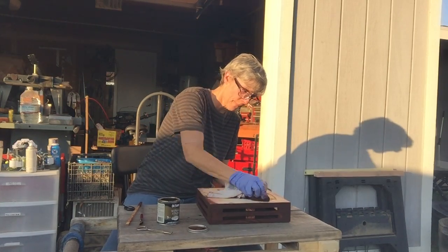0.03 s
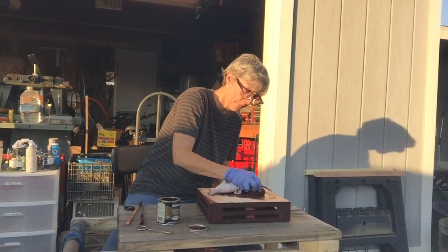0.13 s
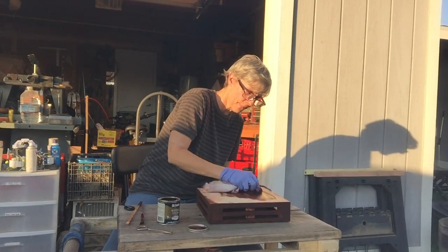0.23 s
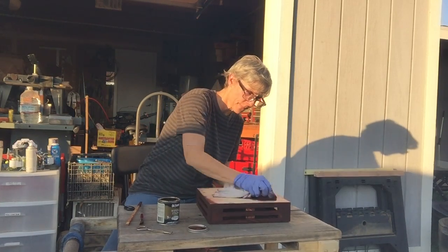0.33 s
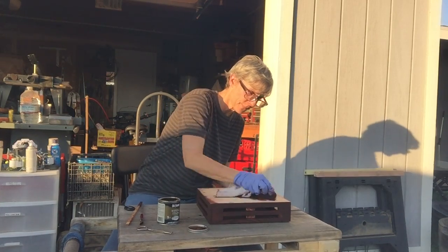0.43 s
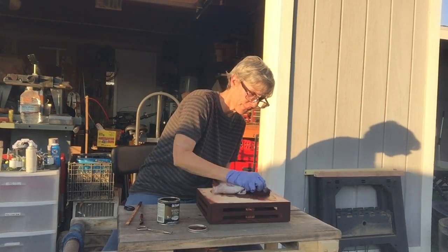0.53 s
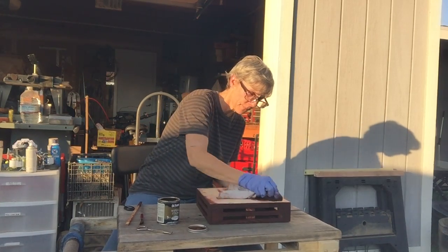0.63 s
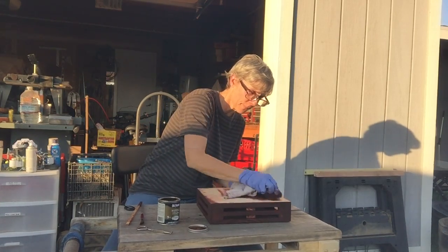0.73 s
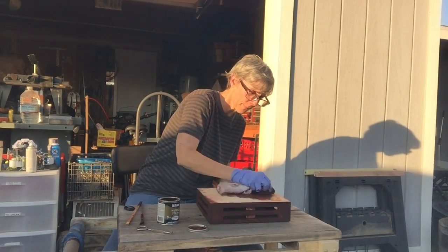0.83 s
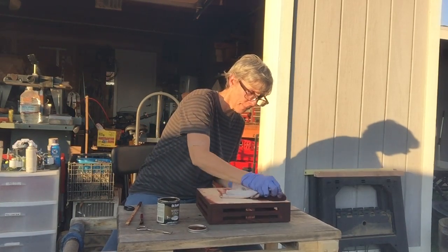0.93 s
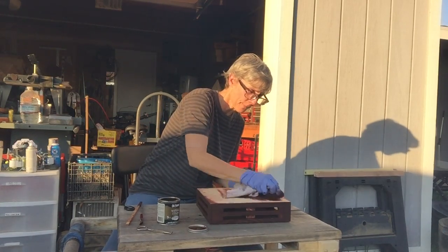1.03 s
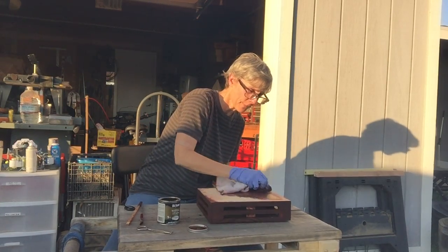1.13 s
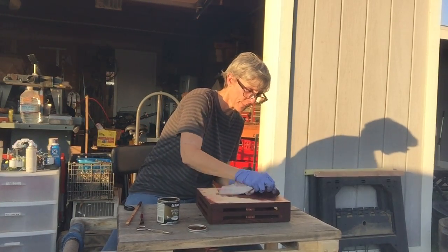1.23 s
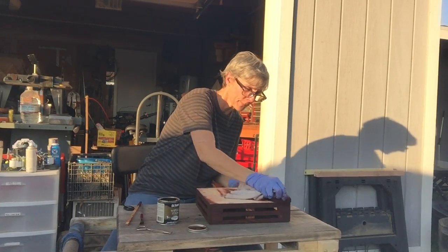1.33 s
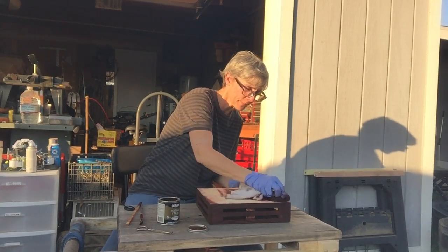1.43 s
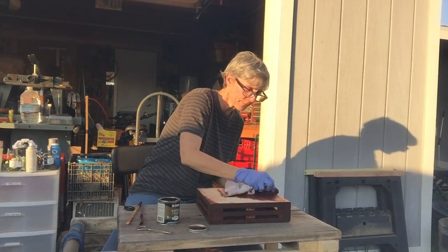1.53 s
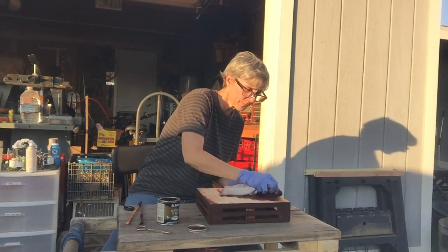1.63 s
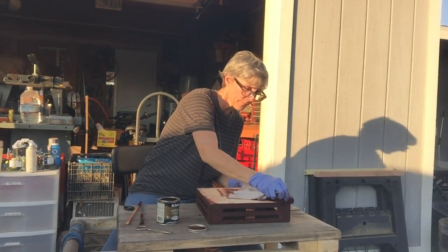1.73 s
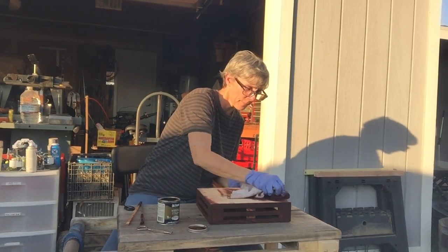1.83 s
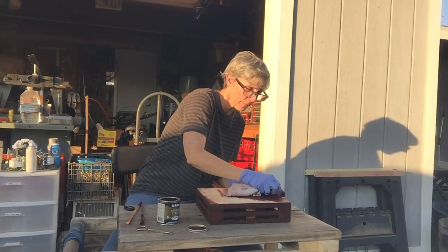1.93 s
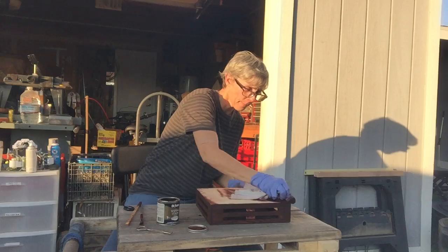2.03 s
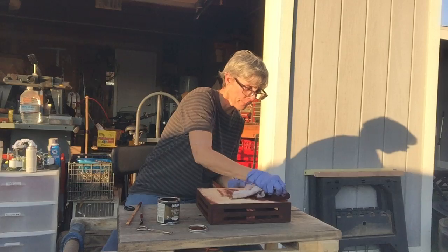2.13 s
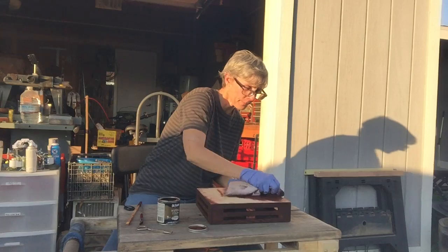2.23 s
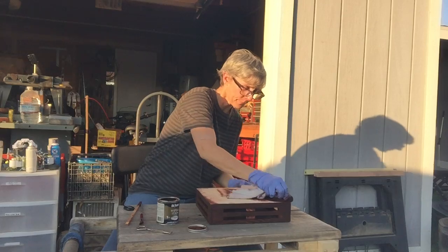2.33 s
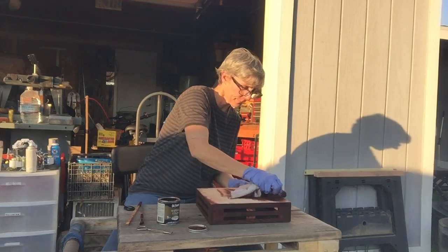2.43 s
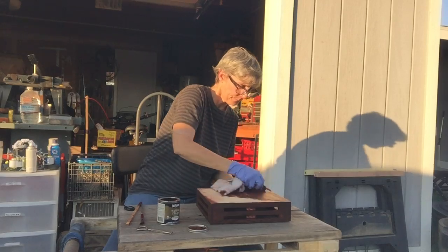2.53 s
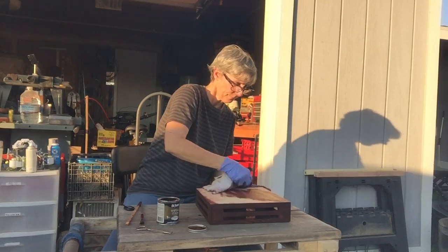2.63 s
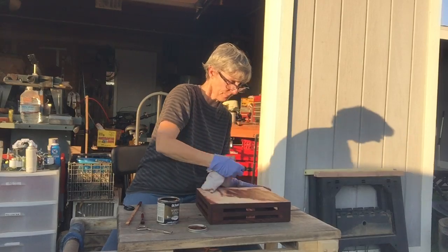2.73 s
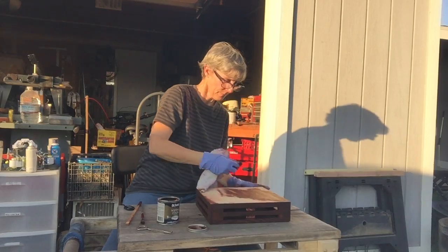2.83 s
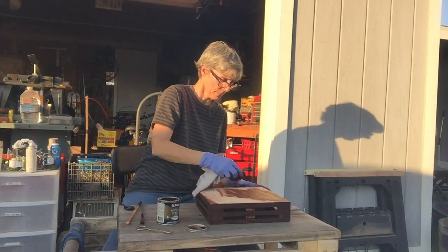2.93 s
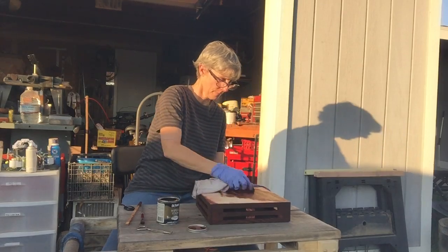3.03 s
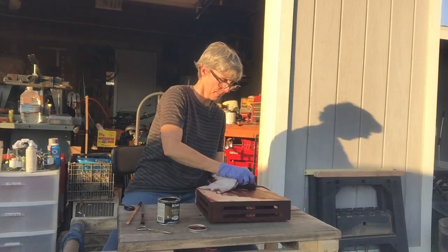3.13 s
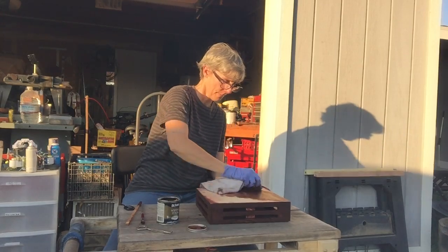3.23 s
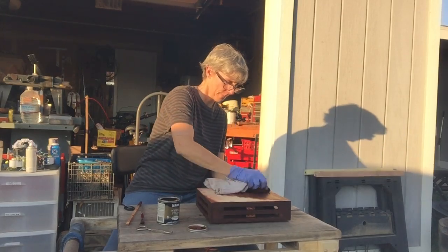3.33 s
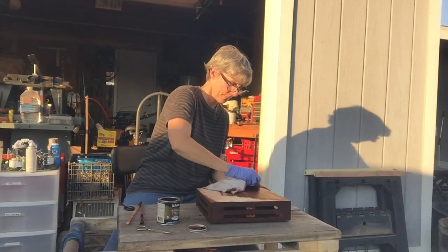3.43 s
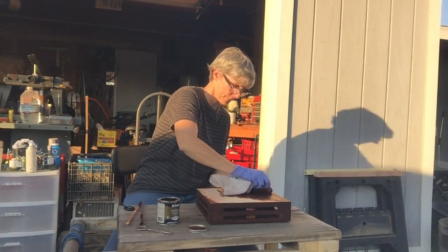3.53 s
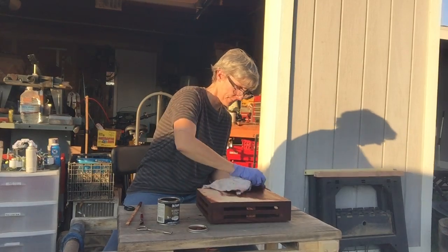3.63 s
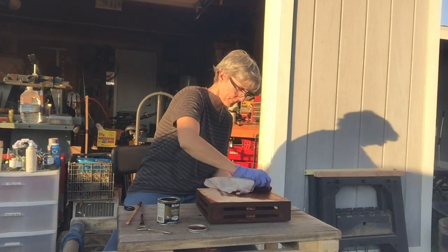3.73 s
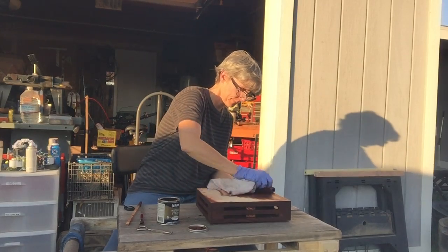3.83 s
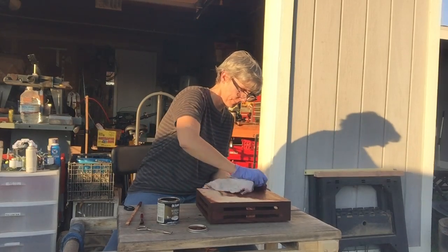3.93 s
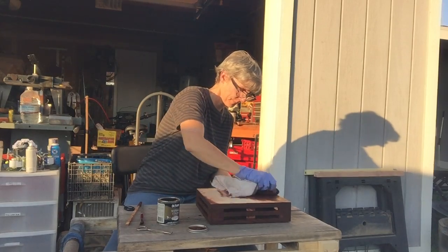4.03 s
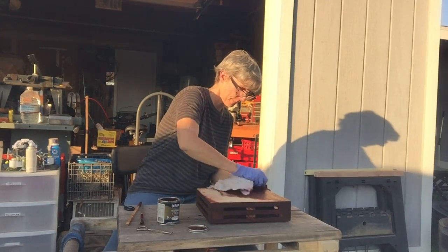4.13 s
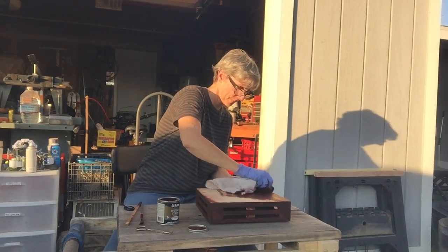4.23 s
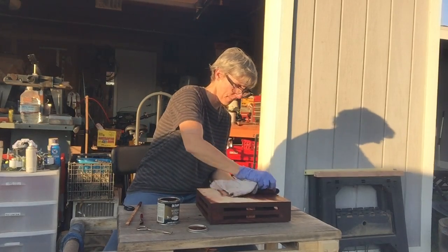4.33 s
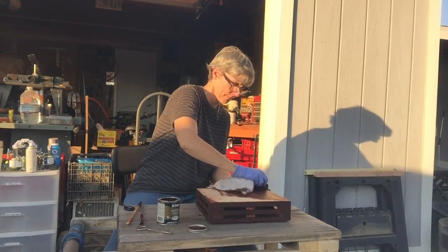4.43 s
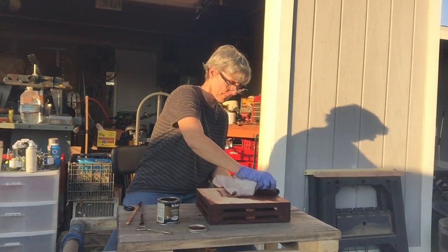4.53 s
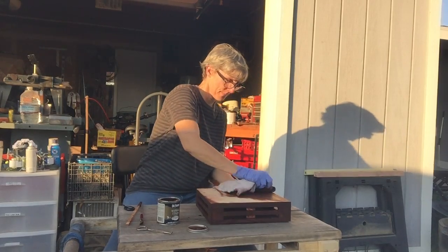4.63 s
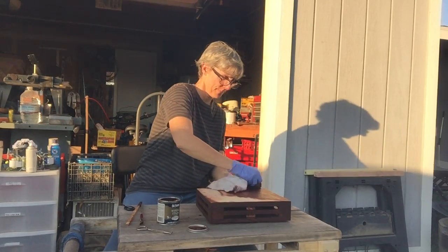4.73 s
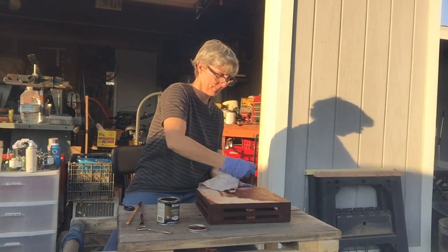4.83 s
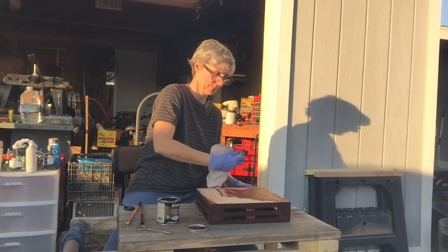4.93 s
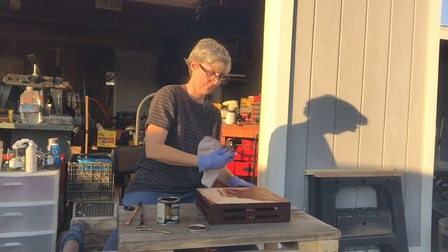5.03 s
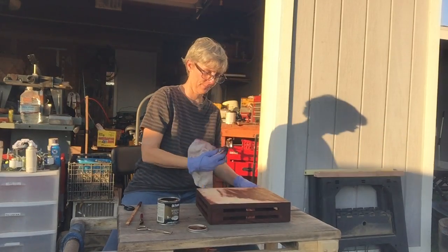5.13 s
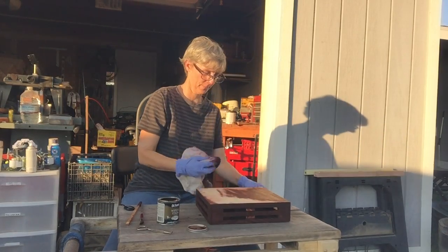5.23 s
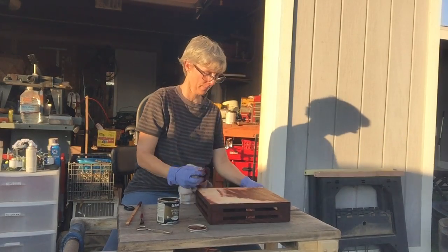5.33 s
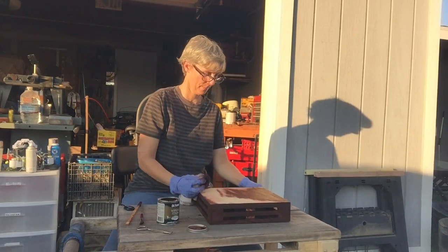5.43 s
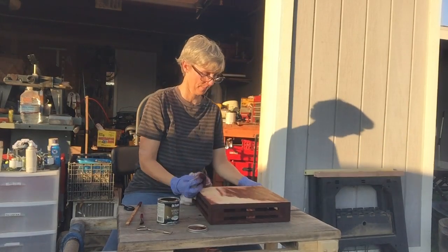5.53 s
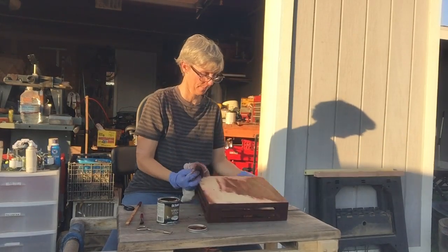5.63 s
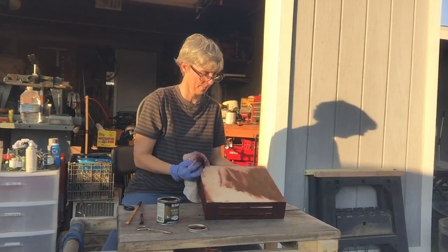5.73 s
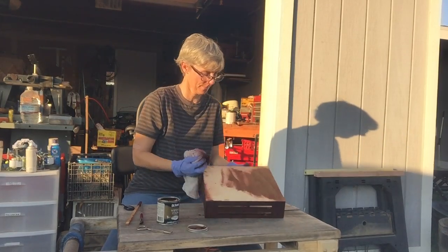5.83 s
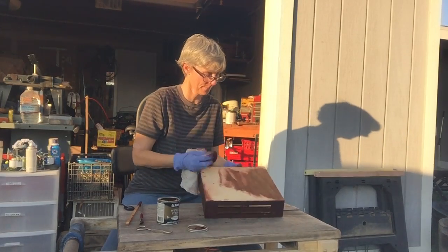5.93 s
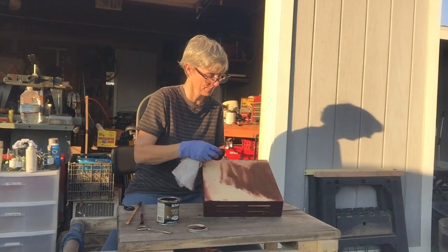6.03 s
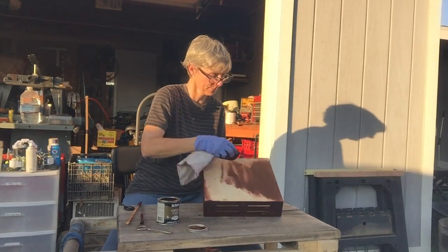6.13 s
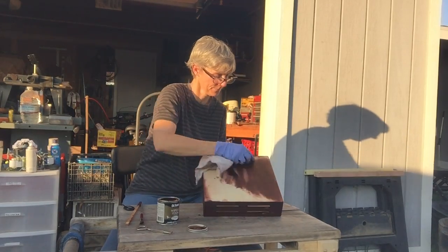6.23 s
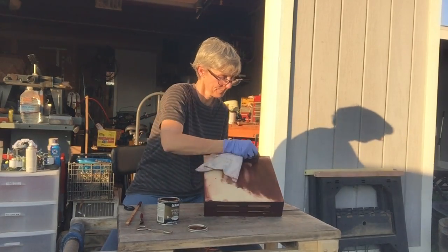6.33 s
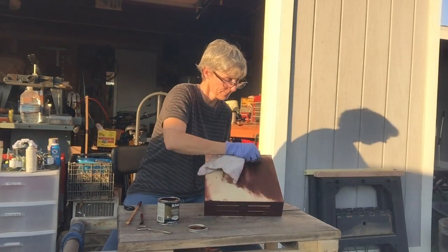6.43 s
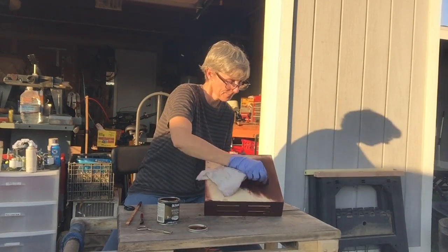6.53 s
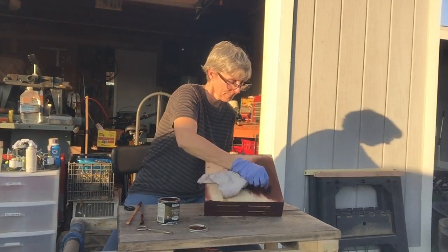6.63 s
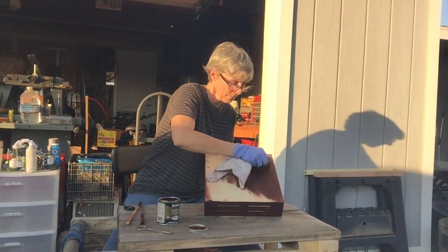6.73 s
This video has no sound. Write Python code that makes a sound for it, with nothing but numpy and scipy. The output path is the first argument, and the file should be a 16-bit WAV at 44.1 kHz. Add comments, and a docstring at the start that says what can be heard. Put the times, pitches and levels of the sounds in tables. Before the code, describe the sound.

A cloth rag rubs back and forth over a hollow wooden box that knocks against a workbench, then briefly scrapes.

```python
"""At an outdoor workbench, a rag is rubbed to and fro over a hollow wooden box, in a quiet hush.
Friction of fibres on the grain makes each stroke hiss. The box rocks, and its impacts on the bench
excite its normal modes. The rag rustles faintly as it is handled; the box is tipped on edge and
dragged twice over the planks, driven by stick-slip friction. A shed wall returns dull echoes."""
import sys
import numpy as np
from scipy import signal
from scipy.io import wavfile

SR = 44100
rng = np.random.default_rng(int(sys.argv[2]) if len(sys.argv) > 2 else 0)


def log_audio(samples):
    """Write samples as a 16-bit WAV file to the path given in sys.argv[1]."""
    # one column per channel
    frames = np.atleast_2d(samples).T
    # limit to full scale, then quantise
    limited = np.clip(frames, -1, 1)
    pcm = np.round(limited * 32767).astype(np.int16)
    wavfile.write(sys.argv[1], SR, pcm)


N = 298998
TIPPED_S = 5.5   # from here the box stands on its edge


def from_db(db):
    """Amplitude ratio of a level."""
    return 10 ** (np.asarray(db) / 20)


def unit_rms(x):
    """Normalisation to rms 1."""
    return x / np.sqrt(np.mean(x ** 2) + 1e-20)


def in_time(rows):
    """Linear interpolation of a table's columns at every sample."""
    times, *columns = np.transpose(rows)
    return [np.interp(np.arange(N) / SR, times, column) for column in columns]


def drift(corner_hz):
    """Low-passed Gaussian noise: a slow fluctuation of rms 1."""
    hold = 40   # samples per value
    r = np.exp(-2 * np.pi * corner_hz * hold / SR)
    slow = signal.lfilter([1], [1, -2 * r, r * r], rng.standard_normal(N // hold + 2002))[2000:]
    return np.repeat(unit_rms(slow), hold)[:N]


def ring(force, hz, t60):
    """Damped oscillator: a unit impulse starts a decaying sine of amplitude 1."""
    r, w = from_db(-60 / (t60 * SR)), 2 * np.pi * hz / SR
    return signal.lfilter([0, np.sin(w)], [1, -2 * r * np.cos(w), r * r], force + 1e-18)


def resonance(x, hz, width):
    """Second-order band-pass with unit peak gain."""
    r = np.exp(-np.pi * width / SR)
    poles = [1, -2 * r * np.cos(2 * np.pi * hz / SR), r * r]
    return signal.lfilter(np.array([1, 0, -1]) * (1 - r * r) / 2, poles, x)


def grains(per_s, spread_db):
    """Shot noise: random impulses of uneven size, rms 1."""
    sizes = from_db(spread_db * np.minimum(rng.exponential(1, N), 4)) * rng.standard_normal(N)
    return unit_rms(sizes * (rng.random(N) < per_s / SR))


def coloured(sources, spectrum, flicker_db, envelope_db=lambda octave: 0):
    """Spectral shaping in flickering third-octave bands; envelope_db takes octaves above 4 kHz."""
    out, power = 0, 0
    table_hz, table_db = np.transpose(spectrum)
    edges = 20 * 2 ** np.arange(0, 10, 1 / 3)
    for k, (low, high) in enumerate(zip(edges, edges[1:])):
        hz = np.sqrt(low * high)
        level = from_db(np.interp(np.log(hz), np.log(table_hz), table_db))
        power += level ** 2 * (high - low) / (SR / 2)
        if hz > table_hz[0]:
            band_pass = signal.butter(2, [low, high], "band", fs=SR, output="sos")
            gain = level * from_db(flicker_db * drift(14) + envelope_db(np.log2(hz / 4000)))
            out += gain * signal.sosfilt(band_pass, sources[k % 2])
    return out / np.sqrt(power)


# Strokes of the rag: start t/s, end t/s, nominal level/dB, nominal ramp time/ms
STROKES = [(-0.02, 0.148, -51, 3.5), (0.205, 0.311, -53, 11), (0.357, 0.479, -49.5, 5),
           (0.552, 0.627, -51, 14), (0.676, 0.776, -51.5, 4.4), (0.843, 0.917, -51, 14),
           (0.976, 1.073, -51.5, 4.4), (1.133, 1.249, -52.5, 10), (1.313, 1.445, -51, 6.5),
           (1.567, 1.664, -53.5, 19), (1.734, 1.837, -52, 10), (1.93, 2.013, -57.5, 14),
           (2.066, 2.14, -52.5, 13), (2.233, 2.316, -57, 20), (2.368, 2.452, -55, 6.3),
           (2.551, 2.707, -52, 25), (3.198, 3.256, -51.5, 5), (3.339, 3.413, -50, 4),
           (3.466, 3.533, -51.5, 4.3), (3.581, 3.656, -48.5, 4.7), (3.713, 3.775, -51.5, 4.4),
           (3.822, 3.9, -51.5, 4.6), (3.956, 4.022, -51.5, 4.5), (4.067, 4.143, -50.5, 4.5),
           (4.198, 4.271, -52.5, 5.5), (4.319, 4.406, -51.5, 5.1), (4.462, 4.536, -52.5, 6.4),
           (4.587, 4.677, -53, 3.5), (4.731, 4.833, -51, 9.1), (6.383, 6.441, -59, 4.6),
           (6.554, 6.703, -52, 7.6), (6.76, 6.822, -56.5, 3.6)]
# Friction spectrum of cloth on wood: f/Hz, relative spectrum level/dB
CLOTH_SPECTRUM = [(400, -48.5), (800, -40.5), (1300, -26), (1800, -12), (2400, -2), (3400, -1.5), (5000, 8),
                  (7000, -5), (9500, 6), (12000, 4), (13500, 0.5), (15000, -0.5), (19000, -17)]
# Panel resonances under the rag: f/Hz, bandwidth/Hz, relative level/dB
LID_RESONANCES = [(2020, 130, -28), (2830, 43, -13), (3560, 24, 5), (5560, 47, -13.5), (6580, 16, 2),
                  (7040, 540, 1), (7660, 310, -4.5), (9300, 65, -17), (9100, 63, -13), (9740, 150, -8),
                  (10400, 29, -6), (11800, 28, -13.5)]
# Stroke shapes, away then back: level change/dB, bass and treble slopes/(dB/octave), rise, fall/ramp time
BROAD_WIPE = (-2, 12.5, -5.5, 1.4, 2.45), (1, 11.5, -5, 0.97, 1.02)
SHORT_SCRUB = (0.5, 10, -2.5, 1.44, 1.45), (0, 10, -4, 1.03, 2)


def rag():
    """Sliding friction: fibres catch on the grain; a slower hand is softer, the treble fading first."""
    t = np.arange(N) / SR
    speed = np.full(N, 1e-4)
    level_db, bass_slope, treble_slope = np.zeros((3, N))
    back, last_end = True, 0
    for start, end, db, ramp_ms in STROKES:
        back = not back and start - last_end < 0.3   # after a pause the hand starts away again
        last_end = end
        manner = SHORT_SCRUB if 3.0 < start < 4.7 else BROAD_WIPE
        change_db, bass, treble, rise, fall = manner[int(back)]
        onset = 1 + np.tanh((t - start) * 500 / (rise * ramp_ms))
        release = 1 + np.tanh((end - t) * 500 / (fall * ramp_ms))
        stroke_speed = onset * release / 4
        leads = stroke_speed > speed
        speed[leads], bass_slope[leads] = stroke_speed[leads], bass
        treble_slope[leads] = treble + 0.5 * (start > TIPPED_S)   # the tipped lid faces the listener
        level_db[leads] = db + np.interp(t[leads], [start, end], [-change_db / 2, change_db / 2])
    speed_db = 20 * np.log10(speed)

    def band_db(octave):
        tilt_db = treble_slope * max(octave - .6, 0) - bass_slope * min(octave, 0)
        return level_db + speed_db * (1 + 0.051 * octave) + tilt_db
    fibres = [grains(14000, spread_db=-2.0), grains(14000, spread_db=-1.0)]
    hiss = coloured(fibres, CLOTH_SPECTRUM, flicker_db=2.4, envelope_db=band_db)
    # the moving rag damps now one panel resonance, now another
    return hiss + sum(from_db(db + 3.5 + 1.3 * drift(5.4)) * resonance(hiss, hz, width)
                      for hz, width, db in LID_RESONANCES)


# Outdoor background: f/Hz, relative spectrum level/dB
HUSH_SPECTRUM = [(15, -31), (25, -12.5), (53, -4), (165, -9.5), (448, -18), (541, -13.5), (690, -21.5),
                 (833, -20.5), (979, -16), (1350, -20), (4810, -29), (7810, -35.5), (15800, -38)]


def hush():
    """Ambient noise: steady, broadband and strongest in the bass."""
    return from_db(-69.5) * coloured(rng.standard_normal((2, N)), HUSH_SPECTRUM, flicker_db=1.0)


# Impacts of box on bench: t/s, nominal peak level/dB, bass loss/(dB/octave)
KNOCKS = [(.063, -34, 20), (.095, -20.5, 4), (0.326, -41, 0), (0.3607, -11, 2.5), (0.4437, -21.5, 5.5),
          (.673, -13, 3), (0.744, -25, 6), (0.978, -16, 4.5), (1.068, -23.5, 4.5), (1.309, -22.5, 1.5),
          (1.387, -23, 3), (1.723, -21.5, 2.5), (2.052, -15.5, 0), (2.3542, -16, 2), (2.769, -22, 3),
          (2.808, -34, -6), (3.151, -49, 0.5), (3.463, -37.5, 0), (3.711, -39, 7), (3.761, -41, 29),
          (3.865, -52, 13), (3.957, -47, 0), (4.003, -44, 9), (4.133, -50, -4), (4.230, -43.5, 15),
          (4.385, -46, -4), (4.408, -30, 5), (4.507, -37.5, 3), (4.647, -45.5, -3), (4.664, -22, 3),
          (4.774, -33, 4.5), (4.962, -26.5, 1.5), (5.696, -24, 22), (6.081, -34.5, 4.5), (6.128, -33.5, 8),
          (6.348, -56.5, 2.5), (6.475, -55.5, -5), (6.509, -50.5, -1), (6.536, -57, 3), (6.607, -54, 18)]


def knocks():
    """Impact: one corner lands, then a second, then a rattle decays; softer blows are duller."""
    times, peak_db, bass_loss = np.transpose(KNOCKS)
    softness_db = np.maximum(-8 - peak_db, 0)
    treble_loss = np.where(times < TIPPED_S, 0.57 * softness_db, 4)   # dB/octave; constant on edge
    t = np.arange(int(.15 * SR)) / SR
    size, chance = np.moveaxis(rng.standard_normal((len(times), 2, len(t))), 1, 0)
    rattle_db = np.minimum(-23.5 + 0.4148 * softness_db, -17)   # capped, so light taps stay crisp
    rattle_envelope = from_db(rattle_db[:, None] - 60 * t / 0.16) * np.clip(t / 0.0031, 0, 1)
    forces = rattle_envelope * size * (chance > 1.6)
    forces[:, [0, round(.0034 * SR)]] = 0.93, 0.54   # the two corners
    return np.round(times * SR).astype(int), peak_db, treble_loss, bass_loss, forces


# Normal modes of the box: f/Hz, relative level flat/dB, relative level tipped/dB, nominal T60/s
BOX_MODES = [(143.6, -17, -6, 0.22), (198, -13.5, 2.5, 0.077), (296.4, -12, 1, 0.2), (341.4, -18, 3, 0.14),
             (429.6, -4, -3, 0.064), (469, -5.5, -27, 0.14), (534.5, 2, 6, 0.042), (612.3, -3, -6.5, 0.064),
             (700.6, -1.5, 7, 0.062), (774.5, -4, -9, 0.075), (855, -1.5, 1.5, 0.045), (940, 4, 1, 0.052),
             (1027, 8, 5.5, 0.088), (1130, 0, -14, 0.066), (1277, 1, 2, 0.048), (1394, 1, -7, 0.088),
             (1570, 2.5, 2, 0.045), (1669, 3.5, 1, 0.021), (1988, -2.5, -11.5, .05), (2044, 0, -7.5, 0.046),
             (2257, -6, -14.5, 0.063), (2717, -12.5, -9, 0.051), (3145, -15.5, -28, 0.09),
             (3240, -18.5, -17, 0.078), (4000, -7.5, -32, 0.01), (4480, -30.5, -19, 0.056),
             (5300, -20.5, -9.5, 0.021), (6020, -33.5, -18, .06), (7600, -30, -17, 0.01)]
# Each drag rests on another edge, which weights the modes near one pitch: f/Hz, gain/dB
EDGE_WEIGHTS = [(534, 7.5), (703, -1)]


def box(rubbing, impacts, slips, grit, edge):
    """Modal superposition: rubbing, knocks and dragging all drive the same damped modes."""
    starts, peak_db, treble_loss, bass_loss, forces = impacts
    edge_hz, edge_db = np.transpose(EDGE_WEIGHTS)
    flat = np.arange(N) < TIPPED_S * SR
    scatter_db = 1.2 * rng.standard_normal((len(starts), len(BOX_MODES)))
    out = 0
    for k, (hz, flat_db, tipped_db, t60) in enumerate(BOX_MODES):
        octave = np.log2(hz / 520)
        edge_gain = from_db(edge_db * np.exp(-(np.log2(hz / edge_hz) / 0.1) ** 2))
        sliding = from_db(-36) * edge_gain[edge] * slips if hz < 1700 else from_db(-13.5) * grit
        # the broad rag drives the modes more evenly than a knock
        rub_gain = np.where(flat, from_db(0.54 * flat_db - 4.5 * max(octave, 0) - 33.5),
                            from_db(tipped_db - 26.5))
        drive = np.pad(from_db(tipped_db) * sliding + rub_gain * rubbing, (0, SR))
        loss_db = treble_loss * octave if octave > 0 else -bass_loss * octave
        tipped_gain = from_db(tipped_db) * edge_gain[edge[starts + 100]]
        coupling = np.where(flat[starts], from_db(flat_db), tipped_gain)
        strengths = coupling * from_db(peak_db - 13 - loss_db + scatter_db[:, k])
        for start, force, strength in zip(starts, forces, strengths):
            drive[start:start + len(force)] += strength * force
        built_up = resonance(drive[:N], hz, hz / 2.7)   # a mode takes a few cycles to build up
        # the bench damps most motion quickly; on edge the box rings longer, until the hand limits it
        damped = ring(np.where(flat, 1.02, 0.48) * built_up, hz, t60 / 2.94)
        flat_tail = 0.68 * ring(flat * built_up, hz, t60)
        tipped_tail = 0.66 * ring(~flat * built_up, hz, min(1.63 * t60, 0.17))
        out += (-1) ** k * (damped + flat_tail + tipped_tail)
    return out


def cracks(impacts):
    """Contact transients: a few milliseconds of bright noise as the wood faces meet."""
    starts, peak_db, treble_loss, *_ = impacts
    t = np.arange(int(.03 * SR)) / SR
    out = np.zeros(N)
    for start, db in zip(starts, peak_db - 12 * treble_loss - 9):
        out[start:start + len(t)] += from_db(db - 60 * t / .03) * rng.standard_normal(len(t))
    return signal.sosfilt(signal.butter(2, [2500, 6000], "band", fs=SR, output="sos"), out)


# Envelope of the rag handled in the air: t/s, level/dB
RUSTLE_ENVELOPE = [(2.7, -102), (3.2, -75), (4.9, -77.5), (5.05, -70), (5.25, -78), (5.4, -74.5),
                   (5.6, -74), (6.25, -76), (6.35, -71.5), (6.5, -69.5), (6.78, -71)]
# Bands of the rustle: f/Hz, bandwidth/Hz, relative level/dB
RUSTLE_BANDS = [(2140, 220, 1.5), (3000, 530, -6.5), (3970, 370, -2.5), (4660, 350, -13.5),
                (5580, 580, -10)]


def rustle():
    """Amplitude-modulated shot noise: the rag's folds sound in narrow bands that come and go."""
    folds = grains(9000, spread_db=-2.0)
    bands = sum(from_db(db + 9.6 * np.tanh(drift(8.6))) * resonance(folds, hz, width)
                for hz, width, db in RUSTLE_BANDS)
    return from_db(in_time(RUSTLE_ENVELOPE)[0]) * unit_rms(bands)


# Two drags over the planks, a list for each: t/s, relative slip level/dB, relative grit level/dB
DRAGS = [
    [(5.695, -46.5, -62), (5.73, -43, -58), (5.78, -46.5, -55.5), (5.84, -43.5, -54.5),
     (5.86, -42.5, -55.5), (5.92, -49, -61), (5.95, -54, -65.5), (6.007, -65, -87), (6.02, -77, -79)],
    [(6.02, -65, -79), (6.064, -52.5, -57), (6.09, -51, -68.5), (6.13, -37, -60), (6.15, -51.5, -72),
     (6.188, -51.5, -69), (6.216, -66, -107), (6.3, -83.5, -95.5)],
]


def drag():
    """Stick-slip friction: heavy slips and fine grit, with the grit's envelope and the edge in contact."""
    slip_envelope, grit_envelope = np.zeros((2, N))
    edge = np.zeros(N, int)
    for k, rows in enumerate(DRAGS):
        slip_db, grit_db = in_time(rows)
        span = slice(round(rows[0][0] * SR), round(rows[-1][0] * SR))
        slip_envelope[span], grit_envelope[span] = from_db(slip_db[span]), from_db(grit_db[span])
        edge[span] = k
    slips = slip_envelope * grains(1200, spread_db=0.5)
    grit = grit_envelope * grains(8000, spread_db=7.5)
    return slips, grit, grit_envelope, edge


# Grit under the sliding edge: f/Hz, relative spectrum level/dB
GRIT_SPECTRUM = [(880, -43), (1500, -21), (2080, 6), (2360, -23), (2730, -32), (3900, -4), (4740, -35),
                 (6010, -17), (15800, -29.5)]


def grit_hiss(envelope):
    """Roughness noise: tiny contacts under the sliding edge radiate directly."""
    contacts = [grains(10000, spread_db=4.5), grains(7700, spread_db=-1.5)]
    return from_db(2.5) * envelope * coloured(contacts, GRIT_SPECTRUM, flicker_db=1.0)


# Cancellations by the bench-top reflection: f/Hz, bandwidth/Hz, gain/dB
BENCH_NOTCHES = [(4860, 940, -6.5), (10440, 1800, -3)]


def reflections(direct):
    """Reflection and interference: the shed wall adds dull echoes, the bench top cuts notches."""
    dull = signal.lfilter(*signal.butter(1, 2500, fs=SR), direct)
    out = direct.copy()
    for lag_s, db in [(.013, -30), (.029, -30.5), (.047, -24)]:
        lag = round(lag_s * SR)
        out[lag:] += from_db(db) * dull[:-lag]
    for hz, width, db in BENCH_NOTCHES:
        out -= (1 - from_db(db)) * resonance(out, hz, width)
    return out


def scene():
    """Superposition: the bench sounds and their reflections add to the hush and rustle, in mono."""
    rubbing = rag()
    slips, grit, grit_envelope, edge = drag()
    impacts = knocks()
    wood = box(rubbing, impacts, slips, grit, edge) + grit_hiss(grit_envelope) + cracks(impacts)
    return (reflections(rubbing + wood) + hush() + rustle())[None]


def record(dry):
    """Band limiting: the deepest bass is lost and the top is cut steeply."""
    thin = signal.sosfilt(signal.butter(4, 38, "high", fs=SR, output="sos"), dry)
    return signal.sosfilt(signal.ellip(12, .5, 70, 15780, fs=SR, output="sos"), thin)


dry = scene()
out = record(dry)
log_audio(out)
```